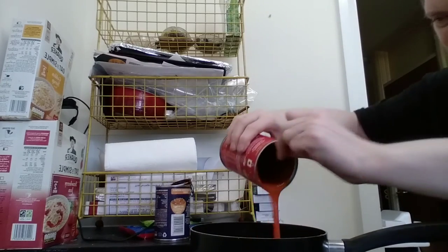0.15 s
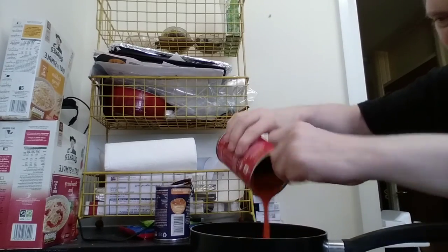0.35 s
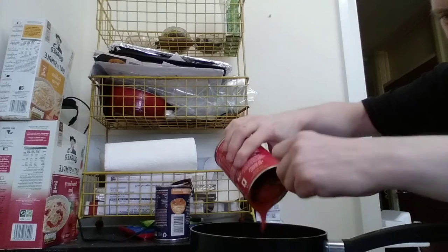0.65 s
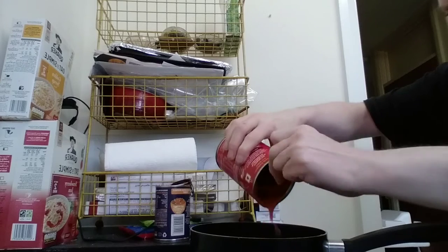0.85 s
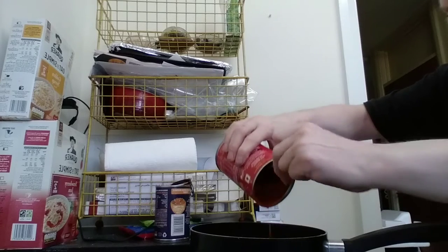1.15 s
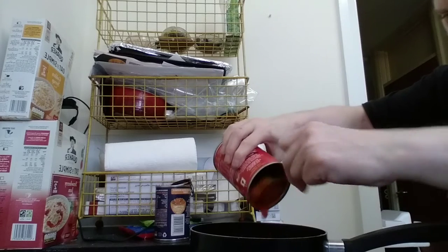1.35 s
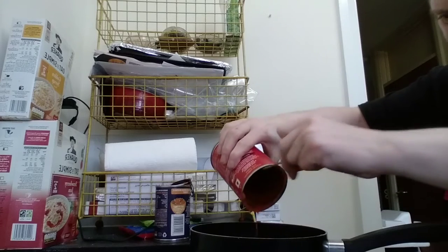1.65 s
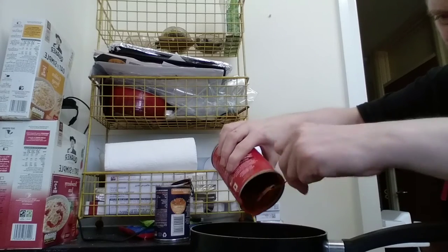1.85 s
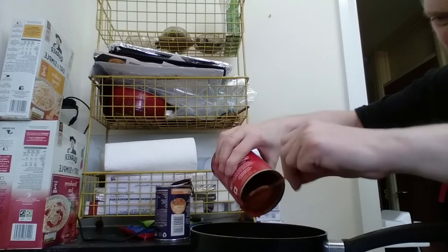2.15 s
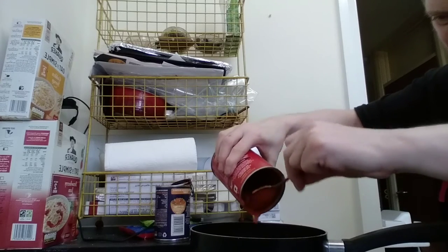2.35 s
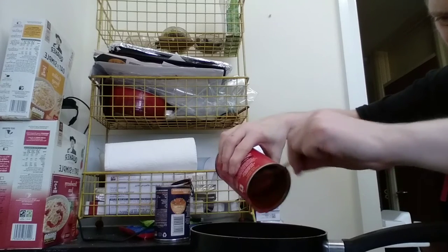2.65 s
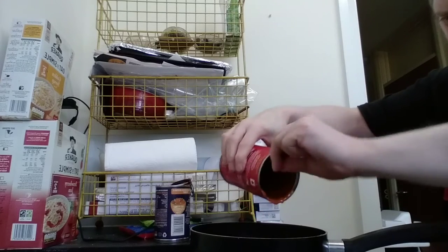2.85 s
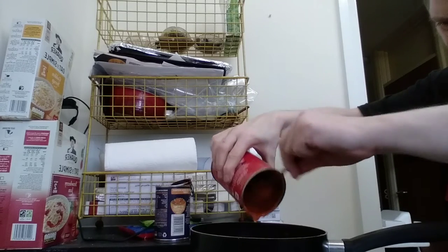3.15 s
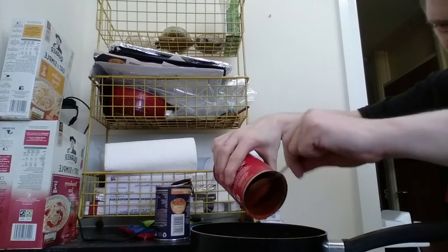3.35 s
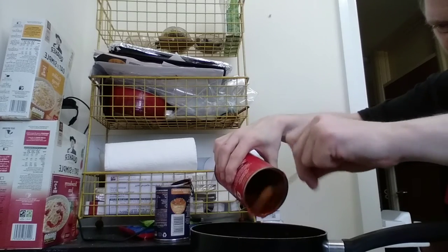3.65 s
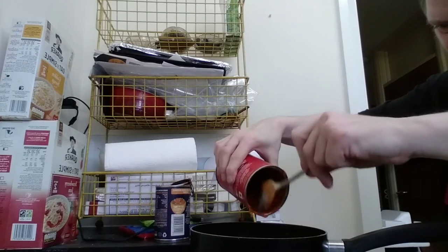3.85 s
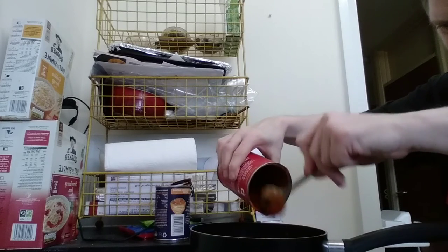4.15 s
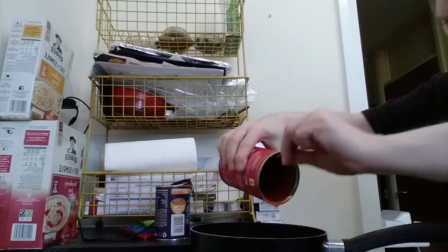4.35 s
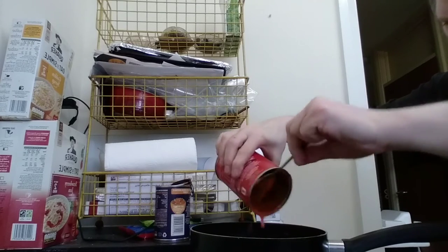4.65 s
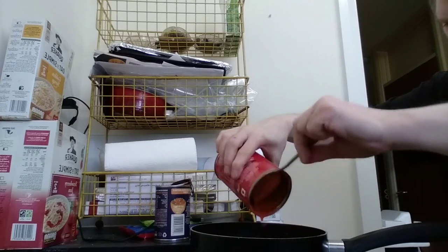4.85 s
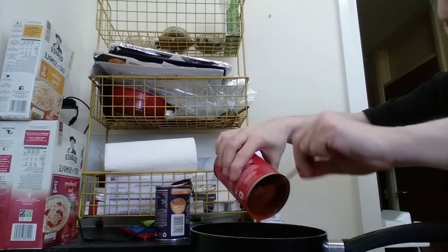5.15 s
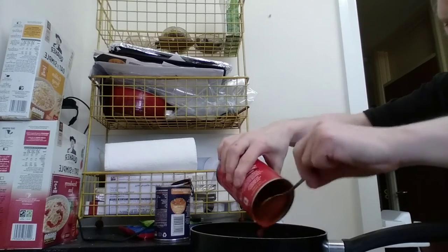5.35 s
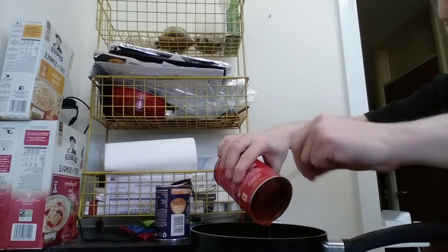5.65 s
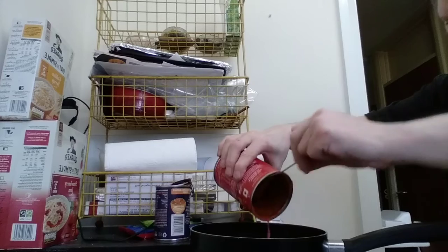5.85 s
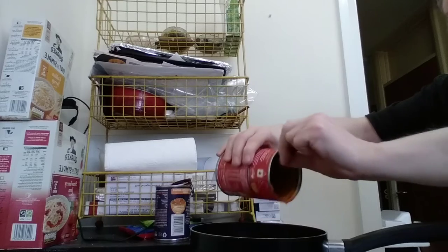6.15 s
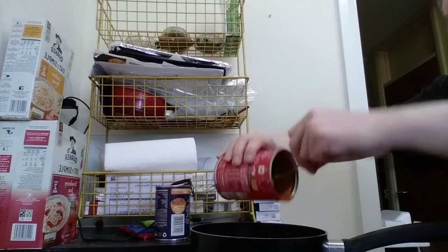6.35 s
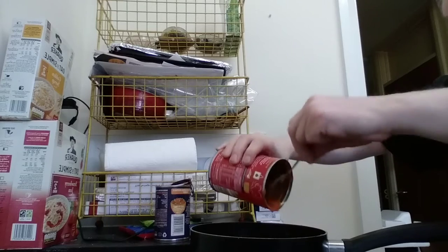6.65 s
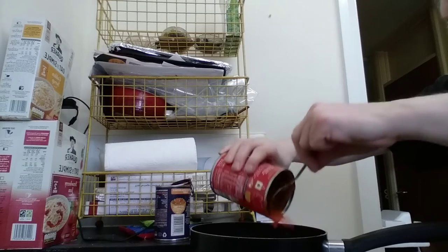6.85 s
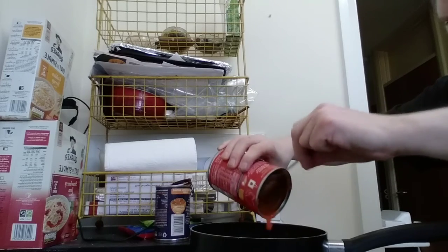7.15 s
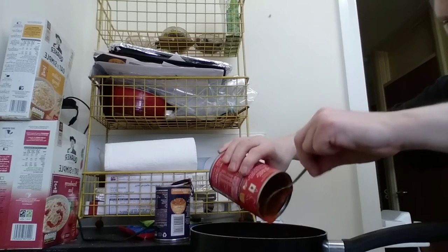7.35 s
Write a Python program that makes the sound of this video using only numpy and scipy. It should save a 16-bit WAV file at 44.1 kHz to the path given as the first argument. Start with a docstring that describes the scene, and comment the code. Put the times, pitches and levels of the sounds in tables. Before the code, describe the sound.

A metal spoon knocks and scrapes rapidly inside a nearly empty tin can, bright hollow clanks and short rasps, close up in a small kitchen.

```python
"""A steel spoon empties a tin of sauce over a pan, close by in a small kitchen.
From the start it knocks on the can, scrapes the tin and at times rattles over its ribs; each contact
excites the thin shell and the air inside. Now and then a freed spoon hums a thin decaying sine.
In the first second blobs plop into the pan as sinking sines; later sliding sauce hisses as filtered
impulses, and near the end a dull rim knock rings low modes. A very quiet room noise lies beneath."""
import sys
import numpy as np
from scipy import signal
from scipy.fft import rfft, irfft, next_fast_len
from scipy.io import wavfile
from scipy.ndimage import uniform_filter1d

SR = 44100
rng = np.random.default_rng(int(sys.argv[2]) if len(sys.argv) > 2 else 0)


def unload_audio(sound):
    """Save the sound as a 16-bit wav file, at the path given as the first command line argument."""
    columns = np.transpose(np.atleast_2d(sound))
    # keep every value between -1 and 1, then stretch to whole-number steps
    steps = np.round(np.clip(columns, -1, 1) * 32767)
    wavfile.write(sys.argv[1], SR, steps.astype(np.int16))


N = 330750

# Spoon contacts inside the can; the edge mostly rings the shell, the bowl pumps the air.
# Columns: start_s, shell_db, hollow_db (relative levels)
CONTACTS = [(0.2917, -14, -19), (0.4361, -5, -23), (0.5386, -8, -18.5), (0.7113, -13.5, -25.5),
            (0.9344, -16.5, -15.5), (1.1917, -18, -20.5), (1.3998, -16, -31), (1.4441, -21.5, -23),
            (1.6035, -11.5, -25), (1.7536, -24, -30), (1.7645, -12, -27.5), (1.7796, -10, -15.5),
            (1.8195, -17, -15.5), (1.8995, -13, -18.5), (1.9689, -15, -32), (2.0416, -13.5, -17.5),
            (2.1347, -20, -22.5), (2.164, -12.5, -36), (2.2302, -16.5, -27), (2.26, -28.5, -28.5),
            (2.3997, -16, -35), (2.4639, -17, -33.5), (2.4805, -16.5, -27.5), (2.631, -11, -27.5),
            (2.7635, -23.5, -42), (2.8759, -17, -26.5), (3.049, -22.5, -43), (3.0615, -15.5, -30),
            (3.1126, -16.5, -32.5), (3.155, -14.5, -27), (3.1672, -25, -17), (3.256, -12.5, -27.5),
            (3.588, -20.5, -36.5), (3.612, -12.5, -38), (3.8909, -21, -47), (3.9999, -15, -45),
            (4.0924, -27.5, -32.5), (4.1594, -15, -23), (4.2108, -10, -26), (4.431, -20, -30.5),
            (4.447, -18, -35), (4.67, -16, -26), (4.698, -16, -15.5), (4.8138, -9.5, -19.5),
            (4.8738, -13.5, -24), (4.8923, -16, -33), (4.903, -7.5, -25), (5.0973, -21.5, -34.5),
            (5.1619, -10.5, -30), (5.2385, -17.5, -33), (5.2475, -11, -33.5), (5.258, -13.5, -31.5),
            (5.2684, -15, -24), (5.2954, -11.5, -24.5), (5.3014, -18, -10), (5.4234, -16, -31.5),
            (5.4668, -9, -18.5), (5.5147, -9.5, -19), (5.6438, -17.5, -22.5), (5.6953, -10, -21.5),
            (5.7355, -12.5, -19.5), (5.8136, -12.5, -25.5), (5.8486, -16, -31), (5.9828, -18.5, -35.5),
            (6.1937, -19.5, -48), (6.2395, -23.5, -40.5), (6.2865, -18.5, -33.5), (6.4683, -17.5, -31.5),
            (6.5093, -5, -23), (6.572, -9, -23.5), (6.6974, -22, -39), (6.722, -9.5, -30),
            (6.767, -13, -19), (6.7977, -4, -15), (6.8998, -13.5, -32), (6.953, -8.5, -18.5),
            (7.0105, -21, -33.5), (7.1196, -14, -30), (7.176, -13.5, -20), (7.22, -12.5, -28.5),
            (7.3243, -17.5, -37.5), (7.392, -16, -23), (7.434, -11, -27.5)]
# Runs over the ribs of the wall, where the spoon speeds up.
# Columns: crest_s, rattle_db (relative), ribs_per_s (at the crest), speed_up_ribs_per_s2
RIB_RUNS = [(0.352, -53.5, 215, 150.5), (0.946, -57, 192, 716), (1.224, -55.5, 175, 500),
            (2.925, -44, 195, 750), (4.501, -43.5, 195, 750), (6.317, -41, 163, 90)]
# Spectral shape of a blow on the can. Columns: freq_hz, density_db (per Hz, relative)
CLACK_COLOUR = [(60, -18.5), (200, -35.5), (330, -9.5), (480, -9.5), (850, 7.5), (1150, -2.5), (1650, -5),
                (2200, 2.5), (4100, 0), (5500, 6.5), (7500, 4), (10500, -1), (12500, -2), (16000, -3)]

HOLLOW_START_HZ, HOLLOW_SINK_HZ_PER_S = 555.1, 3.38  # the air note sinks as the can empties
TIN_T60_S = 0.17  # shell decay after a knock
BARING_DB_PER_S = 0.42  # as the sauce goes, the bare tin rings more freely
HARD_RING_PER_DB = 0.6  # hard blows bring out the fine modes (dB per dB of blow)
# the edge clicks brighter than the bowl, and a hard contact brighter than a light one:
BRIGHT_DB, BRIGHT_SCATTER_DB = -2.5, 0.6  # tilt and its random spread (dB per decade)
BRIGHT_PER_EDGE_DB, BRIGHT_PER_FORCE_DB = 0.03, 0.01  # (dB per decade, per dB of level)
SWELL_T60_S, SLACK_T60_S = 0.12, 0.14  # every stroke swells and slackens alike
RIB_SWELL_T60_S, RIB_SLACK_T60_S = 0.13, 0.2
LANDING_S, GRAZE_DB = 0.081, -13  # a stroke this soon after a knock only grazes the wall before it


def amp(db):
    """Decibels to amplitude ratio: 20 dB is a factor of ten."""
    return 10 ** (np.asarray(db) / 20)


def unit(x):
    """Scale to unit root-mean-square."""
    return x / np.sqrt(np.mean(x ** 2) + 1e-20)


def unit_energy(x):
    """Scale to unit energy, the sum of squares."""
    return x / (np.linalg.norm(x) + 1e-12)


def along(points, hz):
    """Interpolate (frequency, value) points on a logarithmic frequency axis."""
    f, v = np.transpose(points)
    return np.interp(np.log(hz + 1), np.log(f), v)


def clock(size):
    """Sampling instants in seconds."""
    return np.arange(size) / SR


def fade(t, t60):
    """Exponential damping: the level falls 60 dB in t60 seconds."""
    return np.exp(-np.log(1000) * t / t60)


def add(track, s, sound):
    """Linear superposition: mix a sound into the track at s seconds."""
    start = max(round(s * SR), 0)
    track[start:start + len(sound)] += sound[:N - start]


def coloured(x, points):
    """Minimum-phase filtering: the cepstrum is folded to be causal; the response has unit energy."""
    size = 4096
    cepstrum = irfft(np.log(amp(along(points, np.fft.rfftfreq(size, 1 / SR)))))
    cepstrum[1:size // 2] *= 2
    cepstrum[size // 2 + 1:] = 0
    response = unit_energy(irfft(np.exp(rfft(cepstrum))))
    return signal.fftconvolve(x, response)[:len(x)]


def knocks():
    """Impact excitation: each contact gives a crack, a dense clatter, a ringing shell and an air note."""
    out, t = np.zeros(N), clock(SR // 3)
    for s, shell_db, hollow_db in CONTACTS:
        bright_db = brightness(shell_db, hollow_db)
        bare_db = BARING_DB_PER_S * (s - N / SR / 2)  # zero halfway through
        crack, clatter = rng.standard_normal((2, len(t)))
        build_up = 1 - np.exp(-t / (0.00072 * amp(-shell_db - 25.5)))  # lighter touches build up more slowly
        snap = amp(-6.5 + 0.22 * (shell_db + 11.5))  # harder blows crack more
        burst = snap * unit_energy(crack * build_up * fade(t, 0.018))
        burst += amp(-21.0) * unit_energy(clatter * build_up * fade(t, 0.17))
        clack = coloured(burst + amp(-5.0) * kitchen_tail(), touched(CLACK_COLOUR, bright_db))
        ring = amp(-12 - 0.18 * bright_db + bare_db) * tin_ring(t, TIN_T60_S)
        ring += amp(-6 + HARD_RING_PER_DB * shell_db) * fine_ring(t, t60=0.32, count=4)
        add(out, s, amp(shell_db + 15.5) * (clack + build_up * ring))
        hz = hollow_hz(s) * (1 + 0.012 * rng.standard_normal())
        add(out, s, amp(hollow_db + 4.0) * thump(t, hz, bare_db))
    return out


def brightness(shell_db, hollow_db):
    """Contact hardness: spectral tilt in dB per decade from how edge-on and how hard the touch is."""
    harder_db = shell_db - np.mean([row[1] for row in CONTACTS])
    edge_db = shell_db - hollow_db
    return (BRIGHT_DB + BRIGHT_PER_EDGE_DB * edge_db + BRIGHT_PER_FORCE_DB * harder_db
            + BRIGHT_SCATTER_DB * rng.standard_normal())


def touched(points, bright_db):
    """Point excitation: hardness tilts the spectrum and the nodes of the wall ripple it."""
    hz = np.geomspace(50, 16000, num=70)
    ripple_db = 2.6 * rng.standard_normal(len(hz)) * (hz > 600)
    tilt_db = bright_db * np.clip(np.log10(hz / 5000), -1, 1)
    return np.column_stack([hz, along(points, hz) + ripple_db + tilt_db])


def tin_ring(t, t60):
    """Modal synthesis of the shell: the place of contact sets the strength of each mode."""
    # Modes of the tin shell. Columns: freq_hz, level_db (relative, before the contact's variation)
    shell_modes = [(732.1, -48.5), (861.3, -40.5), (1168, -56.5), (1384, -44.5), (1927, -61.5),
                   (1997, -53.5), (2116, -41.5), (2939, -50.5), (3149, -68.5), (3440, -42.5), (5206, -72),
                   (5620, -68.5), (7434, -44.5)]
    hz, db = np.transpose(shell_modes)
    strength, detune, phase = rng.uniform(-0.98, 1, (3, len(hz), 1))
    hz = hz[:, None] * (1 + 0.011 * detune)  # the grip bends the tin a little
    gain = amp(db[:, None] + 6 * strength)
    modes = gain * np.sin(2 * np.pi * hz * t + np.pi * phase)
    return unit_energy(modes.sum(0) * fade(t, t60))


def fine_ring(t, t60, count):
    """High modal density: every touch draws a new handful of modes from each crowded band."""
    # Bands where modes of can and spoon crowd together.
    # Columns: centre_hz, width_hz, level_db (relative)
    crowds = [(5150, 170, 4.5), (5530, 240, -2.5), (6270, 170, 3.5), (7550, 160, 3), (8880, 400, -2),
              (11200, 78, -12.5), (12500, 510, -3), (14360, 100, -14)]
    hz, width, db = np.transpose(crowds)
    place, size, phase = rng.standard_normal((3, count, len(hz)))
    mode_hz = hz + 0.91 * width * place
    bins = np.clip(mode_hz * len(t) / SR, 1, len(t) // 2 - 1).astype(int)
    lines = np.zeros(len(t) // 2 + 1, complex)
    lines[bins] = amp(db) * np.sqrt(np.abs(width)) * size * np.exp(1j * np.pi * phase)
    return unit_energy(irfft(lines, len(t)) * fade(t, t60))


def thump(t, hz, bare_db):
    """Cavity excitation: the bottom flexes with a clank, louder once bare, and pumps the air inside."""
    # Spectral shape of the flexing bottom. Columns: freq_hz, density_db (per Hz, relative)
    clank_colour = [(150, -25.5), (350, -13.5), (600, 4.5), (900, 2), (1150, -11.5), (1400, -11),
                    (2200, -27.5), (6000, -60.5)]
    swell = 1 - np.exp(-t / 0.0036)  # the air takes a cycle or two to build up
    note = swell * fade(t, 0.135) * np.sin(2 * np.pi * hz * t)
    smeared = signal.fftconvolve(note, kitchen_tail())[:len(t)]
    flexing = unit_energy(rng.standard_normal(len(t)) * swell * fade(t, 0.16))
    return note + amp(-14) * smeared + amp(9 + bare_db) * coloured(flexing, clank_colour)


def hollow_hz(s):
    """Cavity resonance: pitch of the air in the can at s seconds."""
    return HOLLOW_START_HZ - HOLLOW_SINK_HZ_PER_S * s


def scrapes():
    """Stick-slip friction: the edge slips over the tin; on the ribs the slips bunch into a rattle."""
    # Spectral shape of the scraped wall. Columns: freq_hz, density_db (per Hz, relative)
    rasp_colour = [(60, -33), (200, -34.5), (330, -14.5), (480, -9.5), (850, 9.5), (1150, -1), (1650, 1),
                   (2200, 7), (3800, 4.5), (5400, 9), (7500, 5.5), (10500, 0.5), (12400, -2.5),
                   (16000, -0.5)]
    phase, rattle = rib_phase(), rattle_gain()
    strength, push = stroke_gains()
    bunching = np.clip(rattle / amp(-56), 0, 1) * 0.75

    wander = unit(uniform_filter1d(rng.standard_normal(N), size=150))
    catching = amp(4.5 * np.tanh(wander))  # the edge grips and lets go
    friction = slips(per_second=1500, spread_db=3) + amp(-1.5) * rng.standard_normal(N)
    grit = unit(catching * friction)
    jolt = unit_energy(rng.standard_normal(64))
    snags = signal.lfilter(jolt, 1, slips(per_second=90, spread_db=1))
    grit = unit(grit + amp(-10.5) * snags)  # the edge jumps burrs
    force = strength * grit * (1 + bunching * np.cos(phase))

    rasp, t = np.zeros(N), clock(SR // 3)
    block = SR // 16
    for start in range(0, N, block):  # the contact point keeps moving
        wall = signal.unit_impulse(len(t)) + amp(-3) * kitchen_tail()
        wall = coloured(wall, touched(rasp_colour, 0))
        ring = amp(-12) * tin_ring(t, TIN_T60_S / 2)  # the spoon damps it
        ring += amp(-6.0) * fine_ring(t, TIN_T60_S / 2, count=6)
        add(rasp, start / SR, signal.fftconvolve(force[start:start + block], amp(-3.5) * wall + ring))

    air_band = signal.butter(2, [350, 800], "band", fs=SR, output="sos")
    drive = signal.sosfilt(air_band, push * slips(per_second=530, spread_db=-1.5))
    groan = rattle * catching * (np.sin(phase) + amp(-9) * np.sin(2 * phase))
    # hard strokes on the ribs set the flat bottom singing
    bottom = unit_energy(np.sin(2 * np.pi * 1385 * t) * fade(t, TIN_T60_S * 1.84))
    pressure = np.clip(strength / amp(-19.5), 0, 1) * bunching
    singing = signal.fftconvolve(pressure * force, bottom)[:N]
    return (rasp + amp(-3.5) * hollow(drive, t60=0.11) + groan
            + amp(-10.5) * wall_flex(force, strength) + amp(-9.5) * singing)


def slips(per_second, spread_db):
    """Stick-slip as a random point process: impulses of uneven size and either sign, rms 1."""
    sizes = amp(spread_db * np.clip(rng.standard_normal(N), -2, 2)) * rng.choice([-1, 1], N)
    return unit(sizes * (rng.random(N) < per_second / SR))


def stroke_gains():
    """Contact pressure: each stroke swells, holds and slackens, for the rasp and the push on the air."""
    # Scraping strokes. Columns: full_pressure_s, hold_s, rasp_db, hollow_db (relative levels)
    strokes = [(0.005, 0.0072, -35.5, -64), (0.06, 0.054, -31, -48), (0.13, 0.17, -44, -58),
               (0.306, 0.045, -25, -19.5), (0.603, 0.024, -23.5, -21), (0.74, 0.021, -29, -29),
               (0.908, .012, -38, -31), (0.93, 0.04, -22.5, -21), (1.046, 0.035, -28, -32.5),
               (1.1, 0.076, -38.5, -38.5), (1.216, 0.03, -20.5, -19.5), (1.28, 0.093, -32.5, -38.5),
               (1.648, .016, -39, -35.5), (1.773, 0.022, -24.5, -22.5), (1.914, .018, -29.5, -31.5),
               (2.178, .03, -36, -61), (2.245, 0.0084, -42, -34), (2.659, 0.063, -31.5, -33.5),
               (2.863, .008, -43, -66), (2.886, 0.013, -24.5, -23.5), (2.921, .024, -21.5, -29),
               (3.311, 0.015, -34, -39), (3.381, 0.0049, -51.5, -68), (3.906, 0.068, -38, -52.5),
               (4.236, .024, -29, -24.5), (4.33, 0.029, -40.5, -45.5), (4.459, 0.0089, -28, -27),
               (4.5, .023, -20, -21), (4.58, 0.043, -38.5, -38), (4.975, 0.0054, -35, -35.5),
               (5.09, 0.0072, -37.5, -63), (5.185, 0.009, -28, -30.5), (5.252, 0.02, -32.5, -34),
               (5.719, 0.0086, -35, -22.5), (6.006, 0.028, -35.5, -32), (6.3, 0.075, -32, -27.5),
               (6.748, .025, -32.5, -25.5), (7.202, 0.016, -37.5, -47), (7.342, .012, -35.5, -55),
               (7.416, 0.012, -38, -28.5)]
    rasp, push = np.zeros((2, N))
    for s, hold, rasp_db, hollow_db in strokes:
        shape = gesture(s, hold, SWELL_T60_S, SLACK_T60_S)
        rasp += amp(rasp_db) * shape
        push += amp(hollow_db) * shape
    return rasp, push


def gesture(s, hold, swell_t60, slack_t60):
    """Exponential envelope: swells up to s, holds and slackens; weaker until the spoon has landed."""
    out, start = np.zeros(N), max(s - 1 / 4, 0)
    landings = [row[0] for row in CONTACTS if 0 < s - row[0] < LANDING_S]
    landing = min(landings, default=start)
    t = start + clock(SR * 3 // 4)
    shape = fade(np.maximum(s - t, 0), swell_t60) * fade(np.maximum(t - s - hold, 0), slack_t60)
    add(out, start, shape * np.where(t < landing, amp(GRAZE_DB), 1))
    return out


def rib_phase():
    """Periodic excitation: an angle that turns once for each rib passed."""
    crest, _, per_second, speed_up = np.transpose(RIB_RUNS)
    run = np.searchsorted((crest[1:] + crest[:-1]) / 2, clock(N))  # the nearest run over the ribs
    since = np.clip(clock(N) - crest[run], -1 / 10, 1 / 10)
    return 2 * np.pi * np.cumsum(per_second[run] + speed_up[run] * since) / SR


def rattle_gain():
    """Amplitude envelope: the rattle swells and dies once for each run over the ribs."""
    return sum(amp(db) * gesture(s, 0, RIB_SWELL_T60_S, RIB_SLACK_T60_S) for s, db, _, _ in RIB_RUNS)


def hollow(drive, t60):
    """Driven cavity resonance: one damped pole at the sinking pitch of the air, energy gain 1."""
    turn = np.exp(2j * np.pi * np.cumsum(hollow_hz(clock(N))) / SR)
    pole = fade(1 / SR, t60)
    resonance = turn * signal.lfilter([1], [1, -pole], drive / turn)
    return np.imag(resonance) * np.sqrt(2 * (1 - pole ** 2))


def wall_flex(force, strength):
    """Bending of the whole wall: only firm strokes add this low body to the rasp."""
    firmness = np.clip(strength / amp(-9.5), 0, 1)
    low_band = signal.butter(3, [200, 470], "band", fs=SR, output="sos")
    return signal.sosfilt(low_band, force * firmness)


def rim_knock():
    """Blunt impact: a blow on the rim as the can is turned rings lower modes that sag in pitch."""
    # Blows on the rim. Columns: start_s, level_db (relative)
    rim_blows = [(6.074, -16)]
    # Modes of the rim. Columns: freq_hz, level_db (relative), double_t60_s (halved below)
    rim_modes = [(620, -4.5, 0.22), (699, 1, 0.14), (1367, -25.5, 0.51), (1710, -23, 0.41),
                 (1830, -34, 0.72), (3020, -32, 0.71), (3545, -13.5, 0.15)]
    out, t = np.zeros(N), clock(SR // 3)
    swell = 1 - np.exp(-t / 0.0024)
    sagging = t + 0.00029 * (1 - np.exp(-t / 0.028))  # starts a little sharp, as the hand shifts
    ring = np.zeros(len(t))
    for hz, db, double_t60 in rim_modes:
        ring += swell * amp(db) * fade(t, double_t60 * 0.5) * np.sin(2 * np.pi * hz * sagging)
    ring = ring + amp(-7) * signal.fftconvolve(ring, kitchen_tail())[:len(t)]
    crack = unit_energy(rng.standard_normal(len(t)) * fade(t, 0.02)) + amp(-0.5) * kitchen_tail()
    for s, db in rim_blows:
        clack = coloured(crack, touched(CLACK_COLOUR, 0.5))
        add(out, s, amp(db + 4.5) * ring + amp(db + 14.0) * clack)
    return out


def spoon_note(t60):
    """Free vibration: the spoon's lowest bending mode hums on once it is lifted clear of the tin."""
    # Notes of the freed spoon. Columns: start_s, level_db, pitch_hz
    free_rings = [(0, -48, 906), (3.255, -39, 959), (3.615, -42, 940)]
    out, t = np.zeros(N), clock(SR)
    for s, db, hz in free_rings:
        add(out, s, amp(db) * fade(t, t60) * np.sin(2 * np.pi * hz * t))
    return out


def sauce():
    """Soft impact and wet friction: thick blobs land in the pan; what slides off the spoon hisses."""
    # Blobs landing in the pan. Columns: start_s, level_db (relative), start_pitch_hz
    plops = [(0.364, -32.5, 345), (0.468, -32, 329), (0.502, -36, 334), (0.675, -38, 308),
             (0.751, -44, 329), (0.813, -50.5, 248)]
    # Spectral shape of the wet hiss. Columns: freq_hz, density_db (per Hz, relative)
    wet_colour = [(1000, -46.5), (4800, -14), (7000, 0.5), (11000, -13.5), (13000, -20.5)]
    out, t = np.zeros(N), clock(SR // 4)
    for s, db, hz in plops:
        swell = 1 - np.exp(-(t / 0.0043) ** 2)
        sagging = hz * (1 - 0.36 * t)  # the note sinks as the blob spreads
        add(out, s, amp(db - 4.5) * swell * fade(t, 0.21) * np.sin(2 * np.pi * sagging * t))
    hiss = unit(coloured(slips(per_second=6000, spread_db=7.5), wet_colour))
    return out + amp(-1.0) * sliding_gain() * hiss


def sliding_gain():
    """Decaying flow: each slide of sauce wanes until the spoon is clear."""
    # Slides of sauce. Columns: start_s, length_s, level_db (relative)
    slides = [(2.79, .07, -52.5), (3.66, .21, -50.5), (5.88, 0.096, -51.5), (6.11, 0.46, -40)]
    gain = np.zeros(N)
    for s, length, db in slides:
        add(gain, s, amp(db) * fade(clock(int(length * SR)), t60=1.2))
    return uniform_filter1d(gain, size=260)  # softens the ends


def kitchen_tail():
    """Diffuse reverberation: noise of unit energy whose bands decay at their own speeds."""
    # Decay of the kitchen. Columns: freq_hz, t60_s
    kitchen_decay = [(150, 0.14), (600, 0.23), (2500, 0.2), (7000, 0.19), (15000, 0.15)]
    hz, t, z = signal.stft(rng.standard_normal(SR // 3), SR, nperseg=256)
    decaying = z * fade(t, along(kitchen_decay, hz)[:, None])
    tail = signal.istft(decaying, SR, nperseg=256)[1][:SR // 3]
    return unit_energy(tail * (1 - np.exp(-clock(len(tail)) / 0.0027)))


def scene():
    """Superposition of spoon, can and sauce over a very quiet room."""
    # Spectral shape of the room noise. Columns: freq_hz, density_db (per Hz, relative)
    room_colour = [(25, -15), (60, -3.5), (120, -7), (300, -18), (1000, -21.5), (4000, -29), (16000, -32.5)]
    can = knocks() + scrapes() + rim_knock()
    no_bass = signal.butter(2, 90, "high", fs=SR, output="sos")
    can = signal.sosfilt(no_bass, can)  # bass below about 90 Hz is cut
    room_tone = amp(-78) * unit(coloured(rng.standard_normal(N), room_colour))
    return (can + spoon_note(t60=0.45) + sauce() + room_tone)[None]


def record(dry):
    """Band limitation: no component is kept at or above the top frequency."""
    top_hz = 15950
    size = next_fast_len(N + SR // 2)
    kept = np.fft.rfftfreq(size, 1 / SR) < top_hz
    return irfft(rfft(dry, size) * kept, size)[:, :N]


dry = scene()
out = record(dry)
unload_audio(out)
```